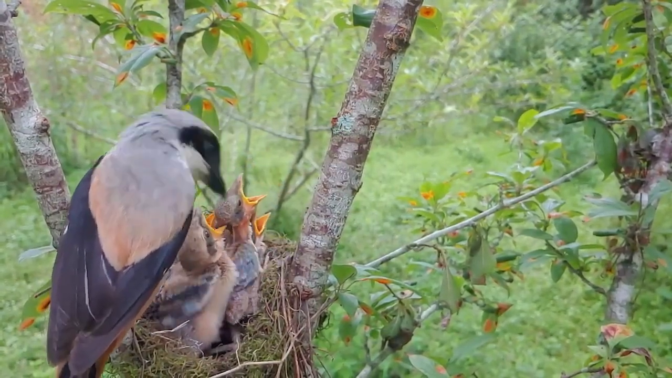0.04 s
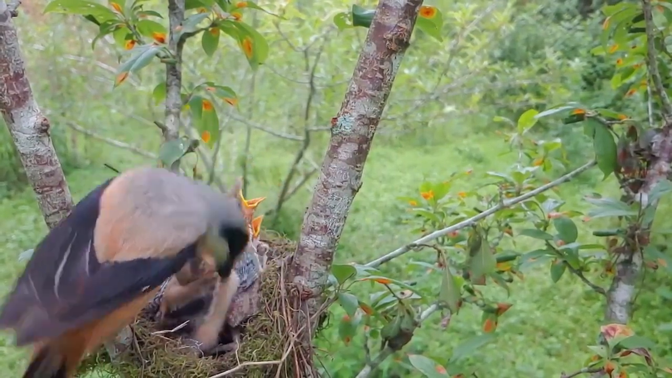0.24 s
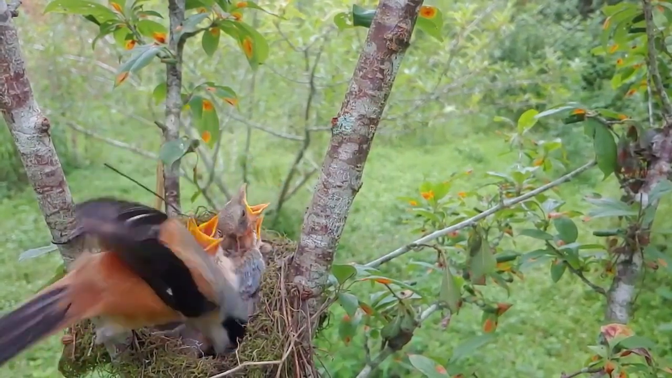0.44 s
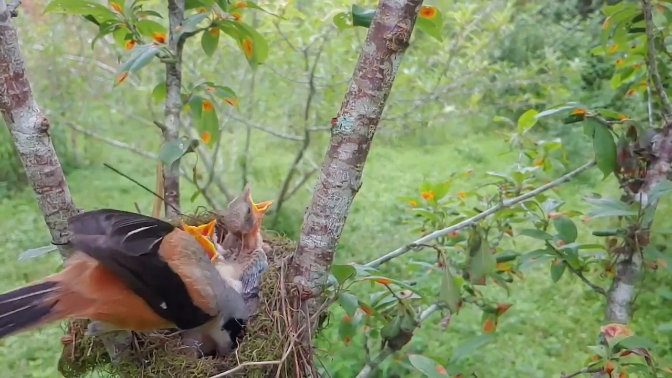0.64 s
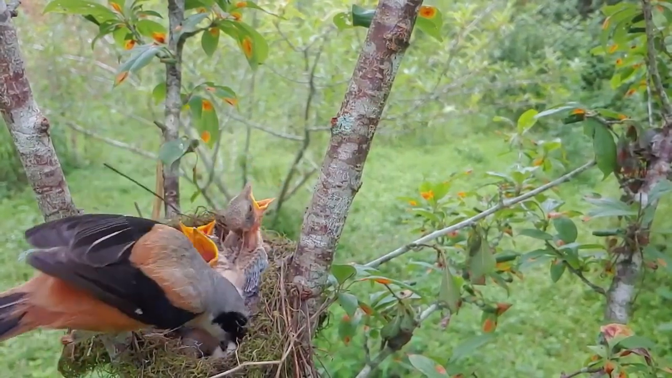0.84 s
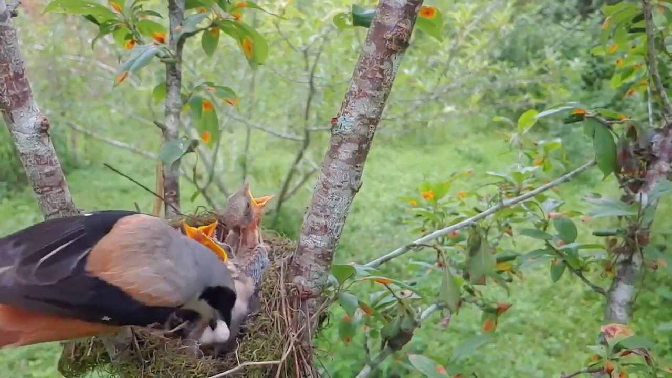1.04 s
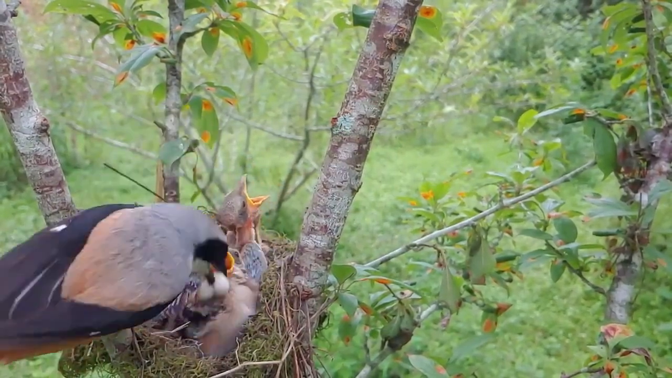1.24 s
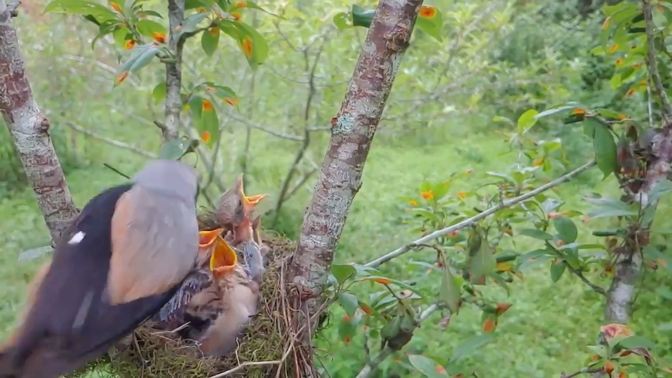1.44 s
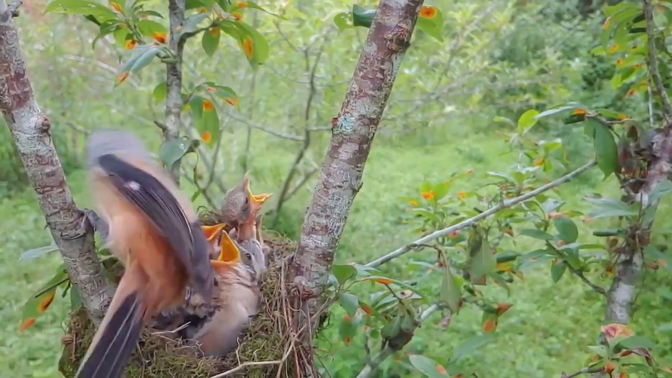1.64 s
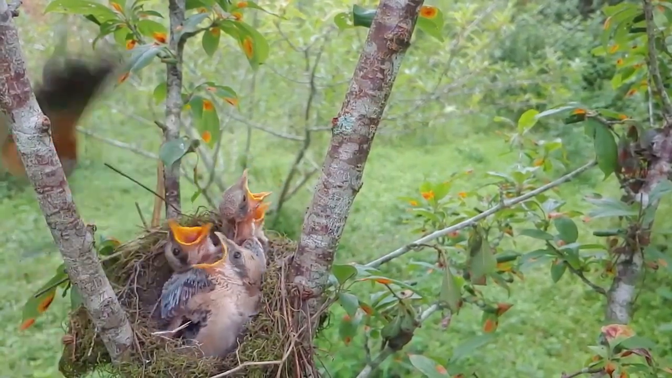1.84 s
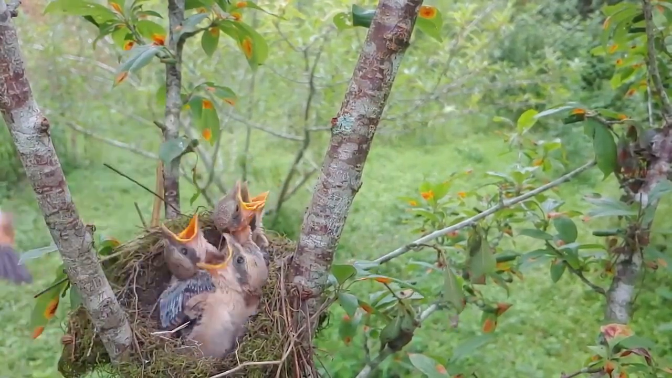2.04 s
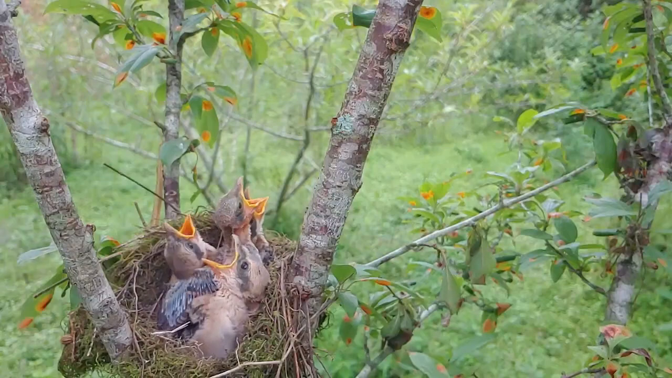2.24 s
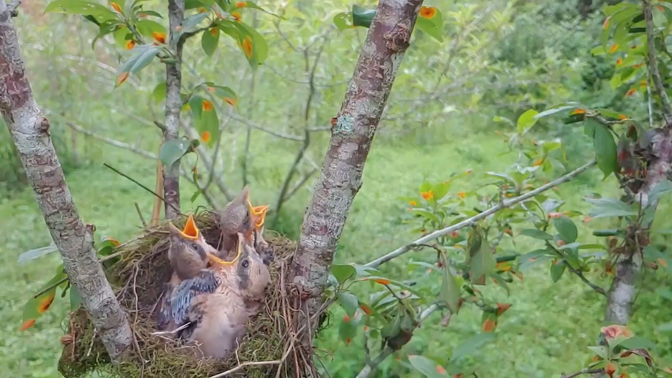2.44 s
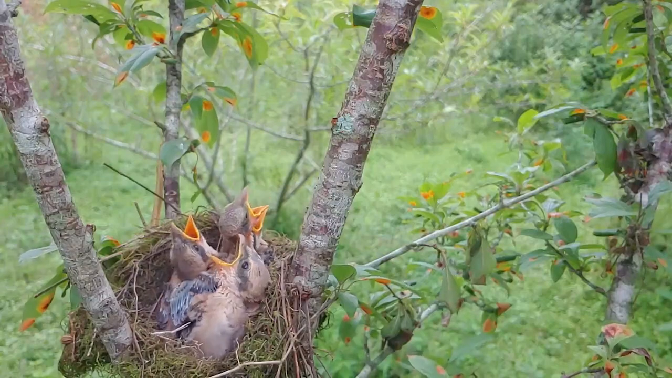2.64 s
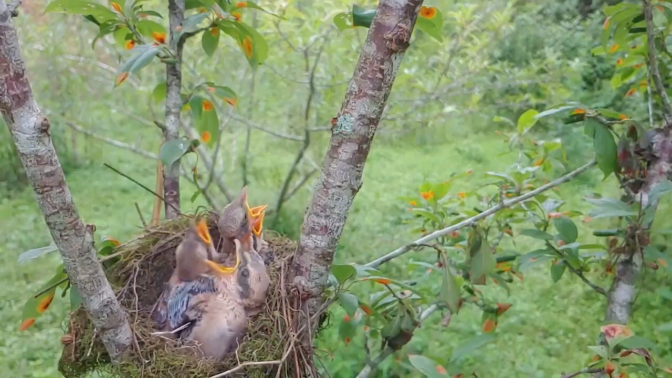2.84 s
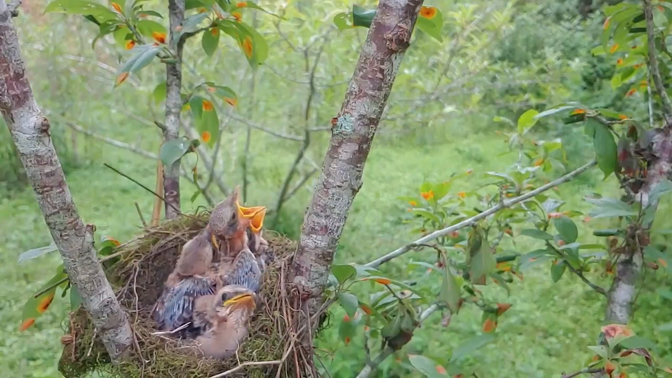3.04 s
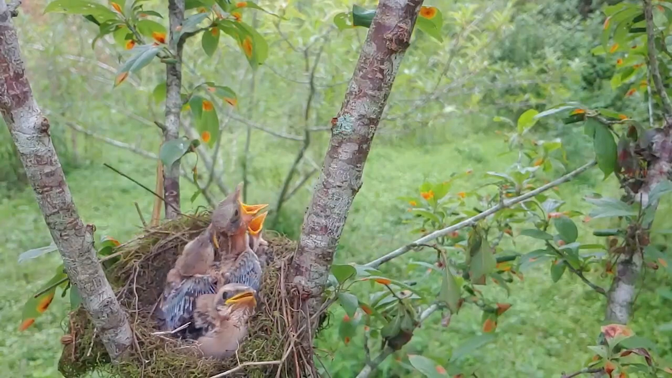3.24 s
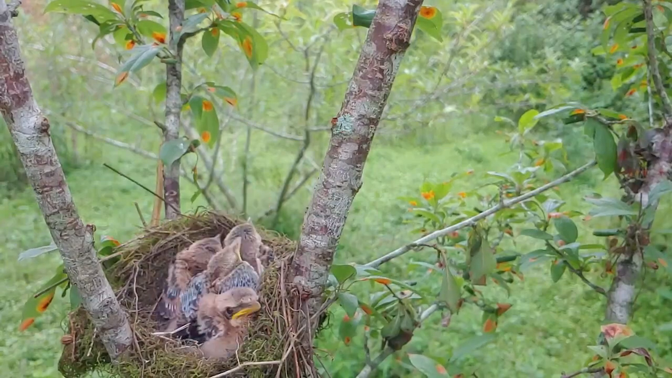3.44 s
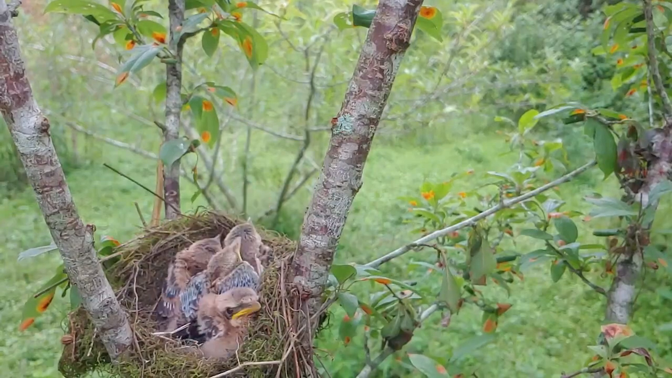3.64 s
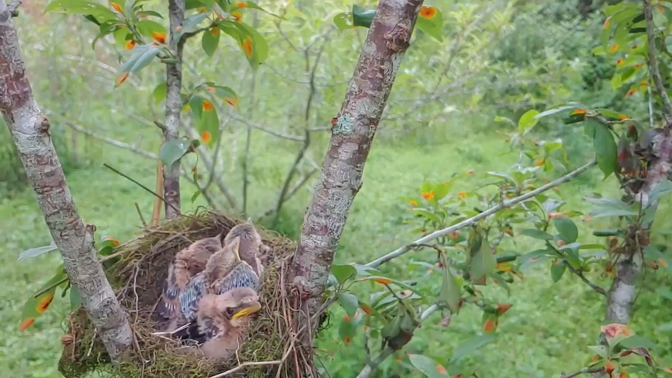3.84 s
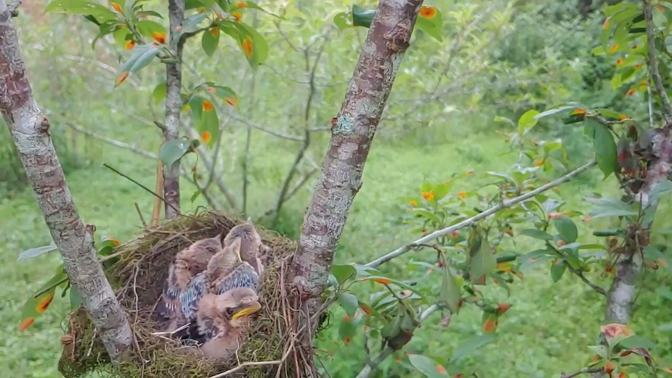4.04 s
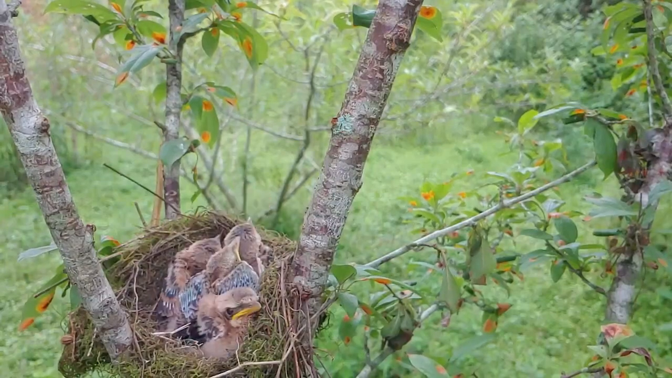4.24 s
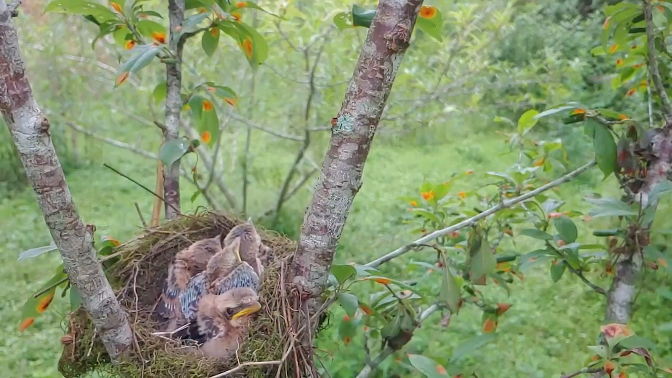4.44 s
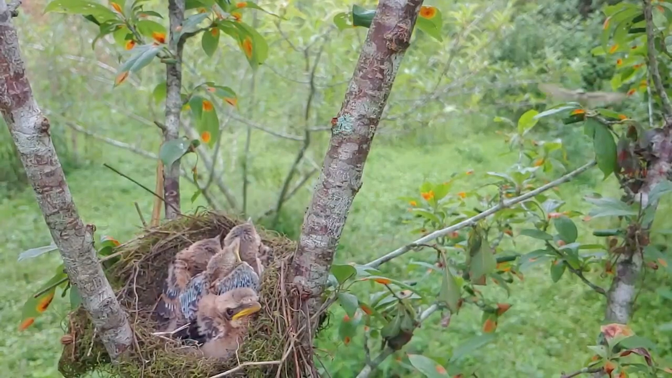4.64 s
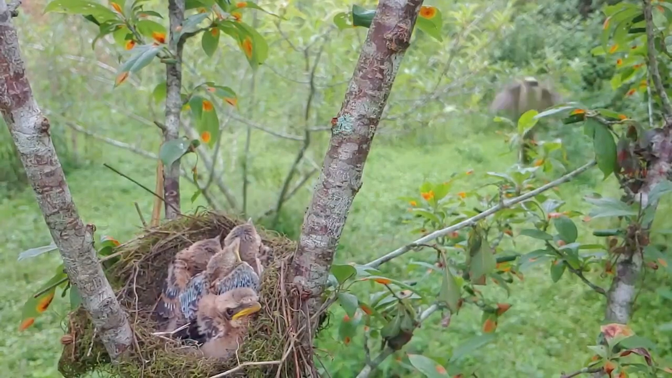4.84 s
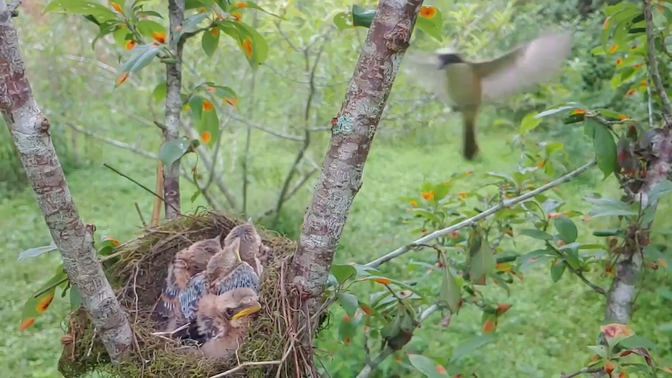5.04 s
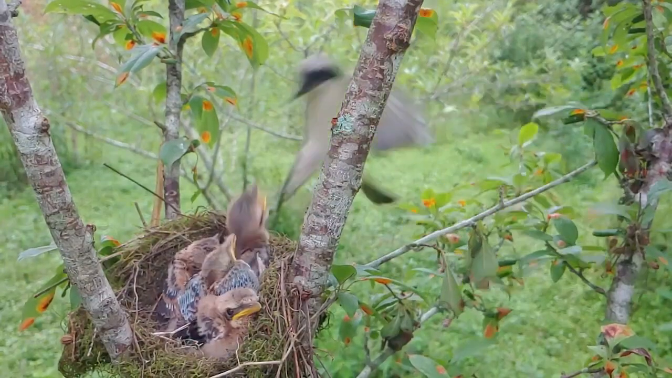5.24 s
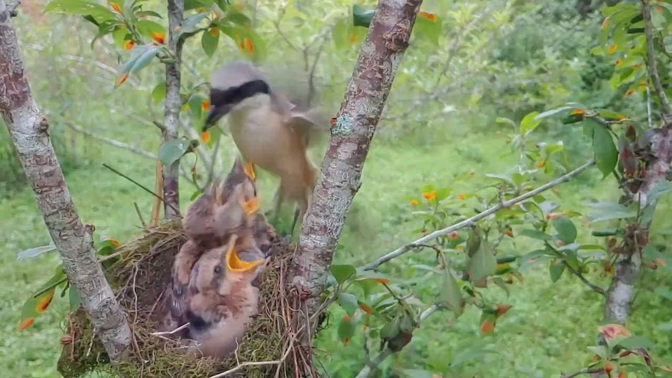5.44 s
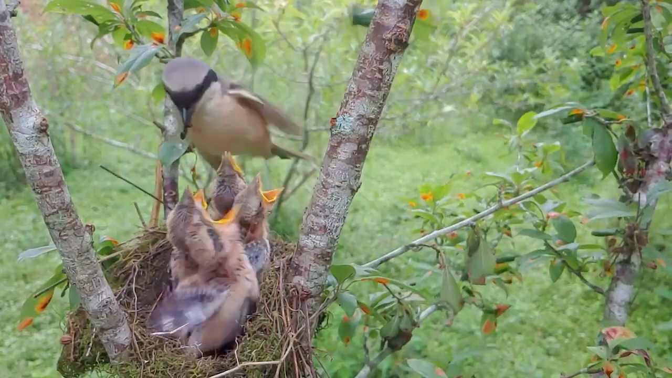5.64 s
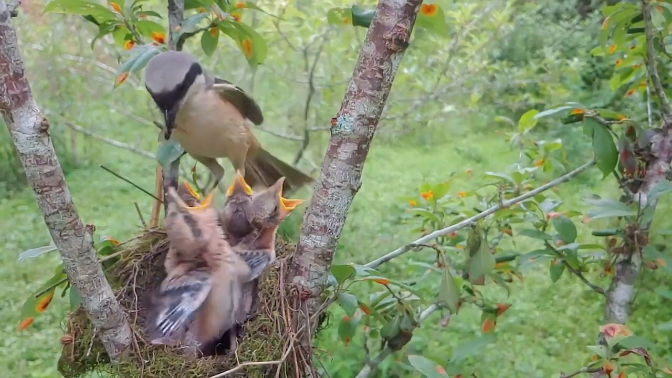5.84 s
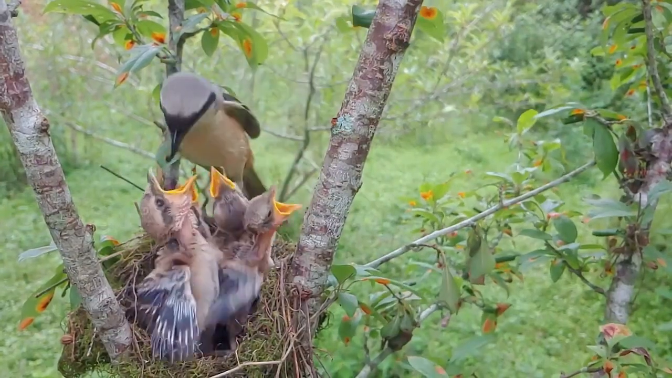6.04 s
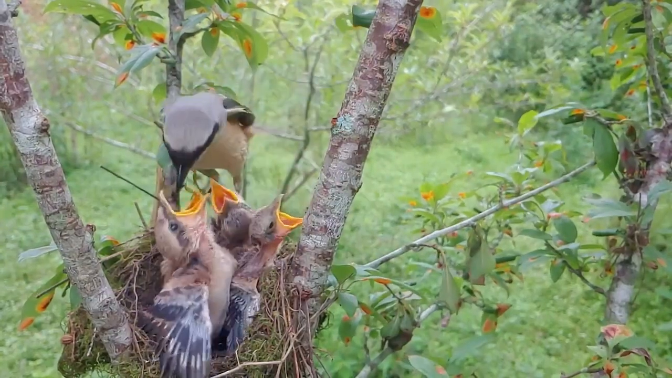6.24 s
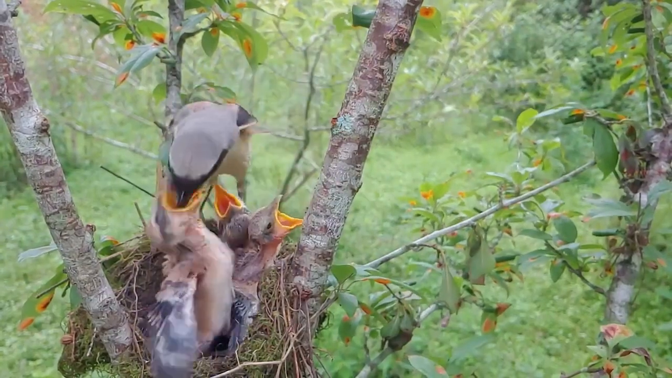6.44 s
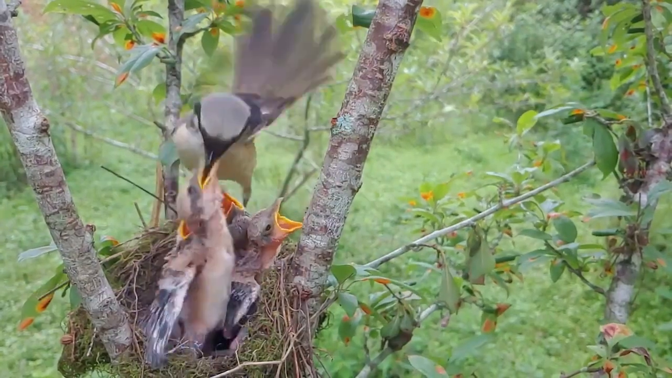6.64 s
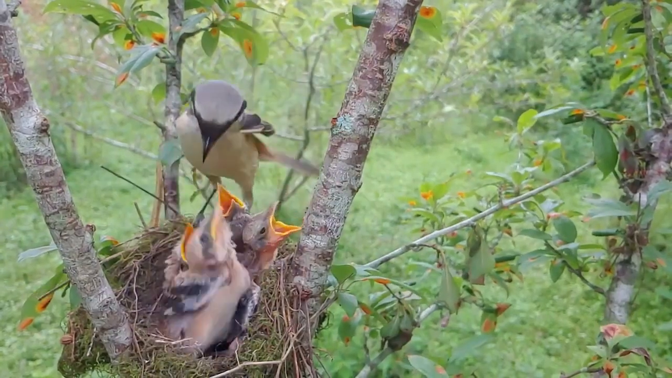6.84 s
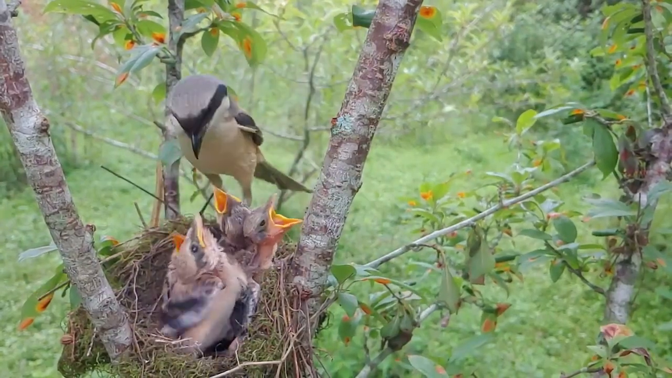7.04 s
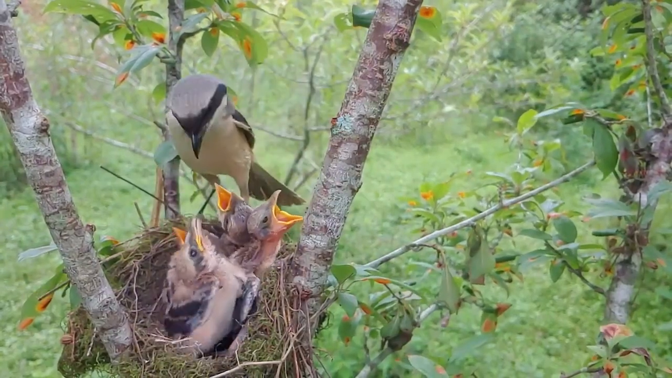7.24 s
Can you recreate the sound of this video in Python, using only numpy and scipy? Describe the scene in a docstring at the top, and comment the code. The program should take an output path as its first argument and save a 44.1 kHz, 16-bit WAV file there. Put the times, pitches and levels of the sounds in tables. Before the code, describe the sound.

Close hungry chicks squeal hoarsely and nonstop, fall nearly silent after a wing flutter, then clamour louder at the next arrival; crickets trill throughout.

```python
"""Shrike nestlings beg in a garden tree: arching whistles that break into rasps, squeaks and plunging chups.
One parent whirrs off, the brood falls quiet, and another flaps in through the leaves and sets them off again.
Crickets chirp all along, with far birds and a faint far motor over soft outdoor air.
Voices are wavering tones with overtones, shaped by a beak response; rasps add throat noise.
Wings are low pulses with bursts of coloured noise; crickets are pulsed tones over a noise chorus."""
import sys
import numpy as np
from scipy import signal
from scipy.fft import rfft, irfft, next_fast_len
from scipy.io import wavfile
from scipy.ndimage import uniform_filter1d, map_coordinates

SR = 44100
rng = np.random.default_rng(int(sys.argv[2]) if len(sys.argv) > 2 else 0)


def pcm_store(signal):
    """Save signal as 16-bit PCM."""
    levels = np.round(np.clip(np.atleast_2d(signal), -1, 1) * 32767)
    wavfile.write(sys.argv[1], SR, levels.astype(np.int16).T)


N = 321930  # samples

# Note tables give nominal times and pitches, and drive levels ahead of the beak and the gains below.

# Outdoor air spectrum. Each row: frequency in Hz, relative level in dB.
AIR_SPECTRUM = [(20, -4), (50, 1.5), (110, -3.5), (300, -7.5), (600, -11), (1000, -15), (1800, -23),
                (2700, -17.5), (4600, -13.5), (5700, -9.5), (6300, -12), (6800, -7.5), (7600, -23),
                (9000, -28.5), (10500, -28.5), (11600, -40), (12300, -80)]
# Far motor. Each row: time in seconds, level in dB.
MOTOR_LEVELS = [(0, -105), (4.1, -86), (4.4, -67.5), (5, -76), (5.8, -73), (7.3, -67)]
# Likeness of the two ears in diffuse noise. Each row: frequency in Hz, left-right correlation.
EAR_LIKENESS = [(50, 0.085), (250, 0.25), (900, 0.11), (3500, 0.38), (7000, 0.019)]
# Mass of far crickets. Each row: frequency in Hz, relative level in dB.
CHORUS_SPECTRUM = [(1820, -42), (3100, -20), (3360, -7.5), (3570, 2.5), (3780, 5.5), (4190, 5.5),
                   (4350, -11), (4380, -19), (4510, -6), (4700, -38), (6110, -58), (10300, -120)]
# Long thin far note. Each row: start in seconds, end in seconds, top pitch in Hz, sag of the ends as a share,
# level in dB.
FAR_NOTES = [(4.85, 5.95, 2162, 0.0039, -64)]
# Soft arched peeps of the brood. Columns as in FAR_NOTES.
PEEPS = [(3.865, 3.9, 3130, 0.074, -69), (3.93, 3.98, 3120, .1, -76), (4.13, 4.17, 3260, 0.12, -66),
         (4.18, 4.225, 3120, .01, -68), (4.255, 4.3, 3030, 0.092, -68), (4.31, 4.35, 2980, .08, -71.5),
         (4.455, 4.493, 3360, 0.16, -63), (4.46, 4.53, 3060, 0.027, -69), (4.505, 4.585, 3240, 0.14, -69),
         (4.783, 4.95, 3210, 0.19, -66), (5.34, 5.41, 3180, 0.16, -65)]
# Parent's take-off, interpolated over the beats. Each row: time in seconds, thump in dB, swish in dB.
TAKEOFF_LEVELS = [(2.05, -57, -56.5), (2.11, -40.5, -58), (2.17, -41.5, -50), (2.23, -48, -58.5),
                  (2.35, -50, -58.5), (2.5, -54, -65), (3.35, -61.5, -85)]
# Wingbeats of the landing parent. Each row: time in seconds, thump in dB, swish in dB.
LANDING_FLAPS = [(5.02, -59, -76), (5.081, -57, -61.5), (5.144, -57, -62), (5.278, -60, -62),
                 (5.318, -53.5, -63), (5.37, -47, -57), (5.421, -50, -55.5), (5.581, -46.5, -47),
                 (5.626, -49, -55), (5.701, -46.5, -45.5), (5.756, -49.5, -47)]
# Feathers on leaves. Each row: frequency in Hz, relative level in dB.
SWISH_SPECTRUM = [(80, 3), (250, 4), (600, 1.5), (1200, 0.5), (2200, -9), (6000, -21), (9000, -13.5),
                  (12000, -23.5), (15500, -77)]
# Throat resonance of the rasp and hiss. Each row: frequency in Hz, relative level in dB.
THROAT_RESPONSE = [(500, -22), (1100, -9.5), (1900, -9.5), (2600, -6), (3500, -1.5), (4600, -4),
                   (5800, -3.5), (6700, -4.5), (7400, -19.5), (10000, -20), (12000, -64)]
# Radiation of the voice from the beak. Each row: frequency in Hz, gain in dB.
BEAK_RESPONSE = [(800, 6), (6500, 1.5), (7000, -12), (7600, -17.5), (10000, -29), (12500, -60)]
# Low notes that flick up into a hook. Each row: start in seconds, hook in seconds, level at the hook in dB.
FLICKS = [(5.919, 5.964, -53.5), (6.016, 6.068, -51.5), (6.092, 6.133, -53.5), (6.214, 6.292, -53),
          (6.402, 6.457, -50.5), (6.581, 6.625, -51), (6.698, 6.787, -66), (6.897, 6.948, -51),
          (7.054, 7.116, -51.5)]
# Low tones that dip and rise. Each row: start in seconds, end in seconds, lowest pitch in Hz,
# turning point as a share, level in dB.
UNDERTONES = [(5.974, 6.064, 2970, .1, -58.5), (5.981, 6.06, 1510, 0.58, -67),
              (6.24, 6.416, 1401, 0.26, -65.5), (6.772, 6.813, 1480, 0.72, -55),
              (6.797, 6.854, 1318, .56, -56.5), (6.896, 6.944, 1523, 0.78, -62.5)]
# Steep arched cries. Each row: start in seconds, end in seconds, top pitch in Hz, sag of the ends as a share,
# level in dB.
CRIES = [(1.216, 1.356, 5030, 0.16, -54), (6.154, 6.194, 4950, 0.148, -46), (6.168, 6.248, 5480, .08, -54),
         (2.377, 2.425, 3200, .1, -51.5), (6.504, 6.59, 5990, .2, -44.5), (6.612, 6.692, 5850, 0.24, -50.5),
         (6.696, 6.783, 5920, 0.1095, -46.5), (6.922, 6.97, 6090, 0.103, -48),
         (6.997, 7.059, 3360, .15, -55.5), (7.014, 7.059, 6850, 0.087, -48), (7.107, 7.137, 5100, .12, -54),
         (7.165, 7.232, 5950, .11, -52.5), (7.16, 7.237, 4200, 0.168, -58)]
# Plain whistles. Each row: start in seconds, end in seconds, top pitch in Hz, sag as a share
# (negative rises), level in dB.
WHISTLES = [(.005, 0.099, 5200, 0.29, -55.5), (.46, 0.534, 6650, 0.17, -53),
            (0.527, .62, 5450, -0.0048, -63), (0.551, .615, 4600, .03, -64),
            (0.742, 0.816, 5250, 0.076, -58), (0.774, .815, 6550, 0.21, -49.5),
            (0.807, .89, 4750, 0.16, -55.5), (0.852, 0.891, 5200, 0.15, -50),
            (0.973, 1.14, 5100, 0.052, -57), (1.124, 1.205, 5900, 0.3, -55),
            (1.465, 1.516, 5450, .01, -48.5), (1.512, 1.661, 5300, 0.32, -51.5),
            (1.558, 1.624, 6200, 0.045, -52.5), (1.651, 1.755, 5700, 0.034, -48),
            (1.741, 1.852, 5000, 0.054, -52), (1.952, 2.054, 4900, 0.042, -60),
            (2.02, 2.125, 5950, .16, -54.5), (2.092, 2.197, 6000, 0.31, -56), (2.228, 2.29, 5200, .1, -52),
            (2.272, 2.34, 4850, .06, -60), (2.547, 2.626, 5800, 0.11, -53), (2.6, 2.666, 4300, 0.26, -53),
            (3.128, 3.187, 5150, 0.027, -55), (3.181, 3.406, 4750, 0.028, -50.5),
            (3.198, 3.26, 4850, 0.17, -54), (5.742, 5.84, 5790, 0.014, -53.5),
            (5.815, 5.841, 3450, 0.077, -59.5), (5.827, 5.852, 6080, 0.08, -53),
            (5.85, 5.96, 6840, 0.13, -59.5), (5.887, 5.964, 4530, -0.013, -52.5),
            (5.934, 6.053, 5000, 0.035, -51), (5.99, 6.056, 5950, 0.093, -47),
            (6.038, 6.09, 3900, .25, -57), (6.082, 6.123, 4650, .06, -50.5),
            (6.253, 6.366, 5130, 0.0039, -51), (6.265, 6.292, 4600, 0.081, -47),
            (6.362, 6.385, 4800, 0.0085, -50.5), (6.36, 6.409, 4000, 0.16, -49.5),
            (6.452, 6.522, 5800, 0.044, -60), (6.556, 6.573, 4500, -.2, -44),
            (6.791, 6.819, 4700, 0.052, -44), (6.8, 6.87, 5500, 0.31, -51),
            (6.871, 6.937, 4500, -0.26, -55), (6.685, 6.715, 3410, .17, -56.5),
            (6.901, 6.937, 2380, 0.26, -60), (7.263, 7.296, 3630, 0.12, -51.5),
            (7.271, 7.293, 6760, .05, -56)]
# Calls that turn hoarse and end on a squeak. Each row: start in seconds, end in seconds, top pitch in Hz,
# sag as a share, whistle in dB, rasp in dB, squeak in dB, left over right in dB (whistle only).
HOARSE_CALLS = [(-0.08, 0.102, 7180, 0.33, -55, -47, -49, 11), (0.137, 0.335, 6020, 0.27, -52, -50, -51, 3),
                (0.375, 0.625, 6030, 0.3, -52.5, -47.5, -47.5, 10),
                (0.689, 0.895, 6740, 0.14, -54, -46, -49, -7),
                (0.968, 1.14, 6430, 0.2, -49.5, -48.5, -48, -1.5),
                (1.217, 1.377, 6540, 0.26, -50.5, -48.5, -52, 1),
                (1.458, 1.626, 6960, 0.3, -54.5, -46.5, -49, 0),
                (1.708, 1.873, 6740, 0.3, -53, -46, -49, 2.5),
                (1.95, 2.163, 6275, 0.28, -49.5, -46, -48, 6),
                (2.243, 2.396, 6120, 0.24, -49, -51.5, -57, 4),
                (2.464, 2.596, 6110, 0.26, -49.5, -49, -55, 3),
                (2.675, 2.833, 6000, 0.26, -51.5, -47.5, -53.5, 9),
                (2.906, 3.059, 6320, 0.28, -51, -47.5, -56, 2.5),
                (3.118, 3.264, 6960, 0.3, -52.5, -46.5, -48, 0),
                (5.524, 5.621, 6000, 0.21, -60.5, -48.5, -56.5, 3),
                (5.654, 5.795, 5290, 0.4, -56.5, -47.5, -53, 3),
                (5.85, 5.979, 5500, 0.14, -53.5, -46, -64, 7), (5.983, 6.14, 5510, 0.27, -59, -52, -57, 8),
                (6.119, 6.197, 4990, 0.031, -55, -52.5, -62, 2),
                (6.21, 6.28, 6670, 0.14, -57, -48.5, -54.5, -3),
                (6.298, 6.461, 5375, 0.067, -47, -53, -51, 3),
                (6.488, 6.613, 5900, 0.21, -53, -46.5, -58, 6),
                (6.679, 6.839, 5860, 0.17, -55, -41.5, -68, 12),
                (7.16, 7.299, 5900, 0.27, -56.5, -46, -59, 8)]
# Calls that plunge into a low chup. Each row: start in seconds, chup in seconds, top pitch in Hz, whistle in dB,
# rasp in dB, squeak in dB, chup pitch in Hz, chup in dB, left over right in dB (whistle only).
CHUP_CALLS = [(-0.1, 0.022, 6170, -53, -65, -50, 1274, -50.5, 10),
              (0.17, 0.27, 6920, -56.5, -70, -49, 1325, -54, 4),
              (0.386, 0.492, 6860, -52, -57, -50, 1270, -52, -2),
              (0.566, 0.695, 6050, -51, -49, -47, 1251, -51.5, 2),
              (0.809, 0.936, 6150, -50, -55, -49, 1264, -53, 2),
              (1.076, 1.186, 6170, -55, -56, -50, 1302, -57.5, -1),
              (1.3, 1.433, 6110, -51.5, -53, -50.5, 1173, -55, 1),
              (1.548, 1.7, 6040, -62, -54, -46.5, 1215, -61, -3),
              (1.832, 1.969, 5990, -48.5, -54, -46.5, 1212, -54, 1),
              (2.079, 2.224, 6080, -52, -45.5, -44, 1326, -51, 3),
              (2.323, 2.424, 5500, -72, -45, -51, 1321, -49.5, -1),
              (2.549, 2.675, 5480, -69, -49, -48.5, 1268, -51, 7),
              (2.814, 2.901, 5700, -55, -51.5, -46.5, 1257, -52, 6),
              (3.067, 3.148, 5940, -53, -53, -49.5, 1287, -51.5, 2),
              (3.274, 3.372, 5780, -54, -57, -47.5, 1212, -50, -9),
              (5.951, 6.089, 5320, -49, -50.5, -54, 1252, -53, 14),
              (6.218, 6.388, 5850, -52, -45.5, -80, 860, -59.5, 10),
              (6.355, 6.418, 4720, -53, -50, -50, 1323, -54.5, 9),
              (6.361, 6.457, 5550, -44, -44, -54, 958, -59.5, -1),
              (6.736, 6.804, 6080, -54, -56, -67, 1155, -52, 10),
              (6.82, 6.946, 4600, -56, -44, -55, 1323, -52.5, -3),
              (6.943, 7.052, 6120, -47, -50, -47.5, 1398, -49, 1),
              (7.06, 7.142, 4730, -54.5, -42.5, -64, 1310, -46, -2),
              (7.127, 7.179, 4250, -56, -51, -76, 806, -64, -6)]

BAND_LIMIT_HZ = 15500
# wings
TAKEOFF_S, WINGBEAT_S = 2.05, .0604  # first beat, beat spacing
PUSH_HZ, PUSH_UPPER_HZ, PUSH_SLIDE_HZ_PER_S = 48, 96, 1500  # thump pitches; the upper falls
PUSH_S, EDDY_DB = 0.023, -2  # Gaussian width; eddies before shaping
SWISH_SOFT_HZ, SWISH_BRIGHTEN = 1120, 0.79  # treble above this grows with strength to this power
# whistles
SCOOP, SCOOP_S, SAG_POWER = 0.1007, 0.00605, 1.4  # flat share at onset, time constant, steepening of the sag
DIVE, DIVE_S = 0.0715, 0.01202  # final pitch drop as the breath runs out: share, time constant
PLAIN_SCOOP, PLAIN_SAG_POWER = .03, 1.2
FADE_DB = -4.5  # early to late
SECOND_RATIO, SECOND_SAG, SECOND_SAG_POWER, SECOND_SCOOP = .8, 0.44, 2.3, 0.171  # other side of the syrinx
SECOND_DB, SECOND_FADE_DB = -12, -10  # against the first side; early to late
CRY_SKEW = .75  # under 1: rises faster than it falls
# rasps and call endings
HISS_DB = -14  # against the whistling
RASP_SHARE, RASP_OVERHANG_S, RASP_DB = .85, 0.01186, -2.5  # hoarse last share, overhang, gain
SQUEAK_S = 0.025  # before a random stretch
CHUP_SAG, CHUP_GAP_S = 0.18, 0.01618  # whistle sag; silence of the whistle before the chup
BREAK_LEAD_S, BREAK_S, BREAK_RATIO, BREAK_DB = .024, .044, 2.68, -2  # squeak before a chup; pitch over the chup's
CHUP_FULL_DB, CHUP_BRIGHTEN = -51.5, 0.62  # weaker chups lose overtones, dB per dB
# flicks and peeps
FLICK_LOW_HZ, FLICK_TOP_HZ, FLICK_SINK = 2060, 2866, 49  # sink: share of the low pitch per squared second
FLICK_S, FLICK_LOW_DB = .017, -8  # Gaussian width; gain per unit of (1.5 - hook)
HOOK_S, HOOK_DB = .06, -12  # faint flick of a hoarse call: time scale, level against the rasp column
PEEP_WAVER, FLUTTER_DB = .017, 190  # pitch waver as a share; level flutter per unit of waver


def amp(db):
    """Decibels to gain."""
    return 10 ** (np.asarray(db) / 20)


def unit(x):
    """Scale to rms 1."""
    return x / np.sqrt(np.mean(x ** 2) + 1e-20)


def along(points, hz):
    """Interpolate (Hz, value) points on a log frequency axis."""
    f, v = np.transpose(points)
    return np.interp(np.log(hz + 1), np.log(f + 1), v)


def wobble(rate_hz, size=N):
    """Smooth random curve through rate_hz random knots a second."""
    knots = rng.standard_normal(int(size * rate_hz / SR) + 4)
    return map_coordinates(knots, [np.arange(size) * rate_hz / SR], order=2)


def running_phase(hz):
    """Integrate a pitch curve in Hz to radians."""
    return 2 * np.pi * np.cumsum(hz) / SR


def filtered(x, response):
    """Multiply the spectrum of x by a response of frequency."""
    m = next_fast_len(N + 8192)
    return irfft(rfft(x, m) * response(np.fft.rfftfreq(m, 1 / SR)), m)[..., :N]


def rush(spectrum, likeness):
    """Stereo noise of rms 1; the mid-side balance sets the left-right likeness."""
    def mid_side_gains(hz):
        angle = np.arccos(np.clip(along(likeness, hz), -1, 1)) / 2
        return amp(along(spectrum, hz)) * [np.cos(angle), np.sin(angle)]

    mid, side = filtered(rng.standard_normal((2, N)), mid_side_gains)
    return unit(np.array([mid + side, mid - side]))


def add(track, start_s, x):
    """Mix x into the track from start_s on, clipping at both ends of the track."""
    i = round(start_s * SR)
    x = x[..., max(-i, 0):max(N - i, 0)]
    track[..., max(i, 0):max(i, 0) + x.shape[-1]] += x


def progress(length_s):
    """0 to 1 over a note, one value per sample."""
    return np.linspace(0, 1, max(round(length_s * SR), 64))


def fades(u, edge):
    """Soft start and end, each a share of the note."""
    return np.sin(np.pi / 2 * np.clip(np.minimum(u, 1 - u) / edge, 0, 1)) ** 2


def voice(hz, overtones_db, pan_db, spread):
    """Tone with overtones through the beak response; a random phase spread widens it between the ears."""
    phase = running_phase(hz)
    ears = amp([[pan_db / 2], [-pan_db / 2]])
    tone = 0
    for k, db in enumerate([0, *overtones_db], 1):
        shift = rng.uniform(0, 2 * np.pi) + spread * rng.normal() * np.array([[1], [-1]])
        tone = tone + amp(db + along(BEAK_RESPONSE, k * hz)) * np.sin(k * phase + shift)
    return np.sqrt(2) * unit(ears) * tone


def foliage(x, t60_s):
    """Short diffuse answer from leaves and trunks: decaying noise, different at each ear."""
    t = np.arange(SR // 2) / SR
    tail = rng.standard_normal((2, len(t))) * amp(-60 * t / t60_s) * (t > .002)
    return signal.fftconvolve(x, tail / np.linalg.norm(tail[0]), axes=1)[:, :N]


def arches(notes, waver):
    """Soft notes that rise and fall; the more they waver, the more they flutter."""
    out = np.zeros((2, N))
    for start_s, end_s, top_hz, sag, db in notes:
        u = progress(end_s - start_s)
        hz = top_hz * (1 - sag * (2 * u - 1) ** 2 + waver * wobble(147.0, len(u)))
        flutter = amp(FLUTTER_DB * waver * wobble(300, len(u)))
        level = amp(db) * flutter * fades(u, edge=0.094)
        add(out, start_s, level * voice(hz, [-25], pan_db=-2.5, spread=0.86))
    return out


def garden():
    """Soft coloured air noise, and a far motor as an unsteady low drone with overtones."""
    air = amp(-60.4 + .9 * wobble(3)) * rush(AIR_SPECTRUM, EAR_LIKENESS)
    motor_hz = 155 * (1 + 0.01 * wobble(3.8) + .03 * wobble(70))
    drone = voice(motor_hz, [3.5, -3, -4], pan_db=-1.5, spread=0.81)
    motor_db = np.interp(np.arange(N) / SR, *np.transpose(MOTOR_LEVELS)) + 2.5 * wobble(10)
    return air + amp(motor_db) * unit(drone)


def cricket(top_hz, fall, strokes_hz, bouts_hz, depth_db):
    """Wing strokes, each a falling tone, swell and ebb in regular bouts."""
    stroke = np.cumsum(strokes_hz * (1 + .1 * wobble(20))) / SR % 1
    bout = np.cumsum(bouts_hz * (1 + 0.022 * wobble(1.97))) / SR + rng.uniform()
    level = fades(stroke, edge=0.21) * amp(depth_db * np.sin(2 * np.pi * bout) + 3 * wobble(40))
    hz = top_hz * (1 - fall * stroke + 0.00768 * wobble(800))
    return unit(level * voice(hz, [], pan_db=-1, spread=0.55))


def crickets():
    """Three near singers overlap above a throbbing far chorus of coloured noise."""
    throb = amp(4.1 * np.sin(running_phase(16 + 0.16 * wobble(1.89))))
    near = amp(-59.5) * cricket(top_hz=4350, fall=.21, strokes_hz=48, bouts_hz=16, depth_db=3)
    second = amp(-63) * cricket(top_hz=4250, fall=.17, strokes_hz=43, bouts_hz=3.3, depth_db=3)
    high = amp(-73) * cricket(top_hz=5450, fall=.11, strokes_hz=95, bouts_hz=9, depth_db=4)
    return near + second + high + amp(-57.5) * throb * rush(CHORUS_SPECTRUM, EAR_LIKENESS)


def far_song():
    """A far bird pipes an even run of notes, loudest near 2 s; a long thin note swells later."""
    starts_s = 1.36 + np.arange(9) / 7.6
    run = [(s, s + 0.072, 2235, .02, -69 - 10 * abs(s - 2)) for s in starts_s]
    swell = amp(-2.5 - 24 * np.abs(np.arange(N) / SR - 5.7) + 1.5 * wobble(8))
    return foliage(arches(run, waver=0.008), t60_s=0.64) + swell * arches(FAR_NOTES, waver=0.0029)


def wings():
    """Each beat thumps the air and swishes the feathers; the whirr fades as the parent flies off."""
    thumps, brush = np.zeros(N), np.zeros(N)
    t = np.arange(-SR // 16, SR // 16) / SR
    beats_s = TAKEOFF_S + WINGBEAT_S * np.arange(22)
    times_s, *levels_db = np.transpose(TAKEOFF_LEVELS)
    leaving = list(zip(beats_s, *[np.interp(beats_s, times_s, db) for db in levels_db]))
    for s, thump_db, swish_db in leaving + LANDING_FLAPS:
        upper = np.sin(2 * np.pi * (PUSH_UPPER_HZ - PUSH_SLIDE_HZ_PER_S * t / 2) * t)
        push = np.cos(2 * np.pi * PUSH_HZ * t) + 0.94 * upper
        eddies = amp(EDDY_DB) * wobble(178.3, len(t)) * np.sin(2 * np.pi * 230 * t)
        eddies = eddies * np.exp(-((t + 0.0029) / 0.01) ** 2)
        thump_level = amp(thump_db - 3.5 + rng.normal(0, 1)) * np.exp(-(t / PUSH_S) ** 2)
        add(thumps, s + t[0] + 0.01194, thump_level * (push + eddies))
        add(brush, s + t[0] + 0.005, amp(swish_db) * np.exp(-(t / 0.012) ** 2))
    swish = brush * unit(amp(4.2 * wobble(600))) * rush(SWISH_SPECTRUM, [(200, 0.95), (4000, 0.58)])
    soft = filtered(swish, lambda hz: 1 / (1 + (hz / SWISH_SOFT_HZ) ** 2))
    return thumps + soft + (swish - soft) * (brush / brush.max()) ** SWISH_BRIGHTEN


def flicks():
    """A low note sinks, then flicks up and swells: faint late in hoarse calls, clear when the brood is eager."""
    out = np.zeros((2, N))
    faint = [(end_s - 1.6 * HOOK_S, end_s - HOOK_S * rng.uniform(0.46, 1.2), rasp_db + HOOK_DB)
             for _, end_s, _, _, _, rasp_db, *_ in HOARSE_CALLS]
    for start_s, hook_s, db in FLICKS + faint:
        u = progress(hook_s + FLICK_S * 0.67 - start_s)
        t = start_s - hook_s + np.arange(len(u)) / SR
        hook = np.exp(-(t / FLICK_S) ** 2)
        hz = FLICK_LOW_HZ * (1 + FLICK_SINK * t ** 2) + (FLICK_TOP_HZ - FLICK_LOW_HZ) * hook
        hz = hz * (1 + .025 * wobble(60, len(u)) + .025 * wobble(900, len(u)))
        level_db = db + FLICK_LOW_DB * (1.5 - hook) + 3.4 * wobble(400, len(u))
        add(out, start_s, amp(level_db) * fades(u, edge=0.1) * voice(hz, [-6], pan_db=-2, spread=0.15))
    return out


def undertones():
    """A low, unsteady tone dips and swings up again under the most eager calls."""
    out = np.zeros((2, N))
    for start_s, end_s, lowest_hz, turn, db in UNDERTONES:
        u = progress(end_s - start_s)
        hz = lowest_hz * (1 + (u - turn) ** 2 + .025 * wobble(700, len(u)))
        level = amp(db + 1 + 2.5 * wobble(350, len(u))) * fades(u, edge=.12)
        add(out, start_s, level * voice(hz, [-5, -9], pan_db=-0.5, spread=.3))
    return out


def chups():
    """A very short plunging note; the harder the chup, the richer its overtones, up to full level."""
    out = np.zeros((2, N))
    for _, chup_s, *_, chup_hz, db, _ in CHUP_CALLS:
        u = progress(.017)
        hz = chup_hz * np.exp(-.46 * (u - .5)) * (1 + 0.02 * wobble(1180, len(u)))
        overtones_db = np.array([-7.5, -1.0, -7.5, -1.5, -9, 0.5])
        overtones_db = overtones_db + CHUP_BRIGHTEN * min(db - CHUP_FULL_DB, 0)
        level = amp(db + 5.0) * fades(u, edge=0.62)
        add(out, chup_s - len(u) / SR / 2, level * voice(hz, overtones_db, pan_db=-0.5, spread=0.033))
    return out


def squeaks():
    """A short slide, ever steeper and randomly varied, ends a hoarse call or leads into a chup."""
    out = np.zeros((2, N))
    notes = [(end_s - 0.38 * SQUEAK_S, SQUEAK_S, 2950, db) for _, end_s, *_, db, _ in HOARSE_CALLS]
    notes += [(chup_s - BREAK_LEAD_S, BREAK_S, BREAK_RATIO * chup_hz, db + BREAK_DB)
              for _, chup_s, *_, db, chup_hz, _, _ in CHUP_CALLS]
    variations = rng.uniform([.65, .6], [1.15, 1.3], (len(notes), 2))
    for (middle_s, length_s, pitch_hz, db), (stretch, steep) in zip(notes, variations):
        u = progress(length_s * stretch)
        slide = steep * (.1 - .12 * u - .22 * u ** 3)
        hz = pitch_hz * (1 + slide + .03 * wobble(130, len(u)) + .045 * wobble(1200, len(u)))
        level = amp(db - 1.0 + 2.0 * wobble(710, len(u))) * fades(u, edge=0.27)
        squeak = level * voice(hz, [-9, -12], pan_db=-0.5, spread=0.11)
        add(out, middle_s - length_s * stretch / 2, squeak)
    return out


def hoarse_stretches():
    """(start s, end s, level dB) of the rasp in the later part of each call."""
    calls = [(start_s, end_s, db) for start_s, end_s, _, _, _, db, *_ in HOARSE_CALLS]
    calls += [(start_s, chup_s, db) for start_s, chup_s, _, _, db, *_ in CHUP_CALLS]
    return [(end_s - RASP_SHARE * (end_s - start_s), end_s + RASP_OVERHANG_S, db + RASP_DB)
            for start_s, end_s, db in calls]


def rasps():
    """The voice breaks into jittery pulses at a falling rate, mixed with air noise; each swells and stops short."""
    pulses, effort = np.zeros((2, N)), np.zeros(N)
    for start_s, end_s, db in hoarse_stretches():
        u = progress(end_s - start_s)
        swell = amp(db - 10.0 * np.abs(u - .74)) * fades(u, edge=0.18)
        jitter = .018 * wobble(110, len(u)) + .018 * wobble(1500, len(u))
        rate_hz = rng.uniform(680, 950) * (1 - .3 * u ** 3 + jitter)
        mean_hz = rate_hz.mean()
        overtones_db = along(THROAT_RESPONSE, mean_hz * np.arange(2, 14)) - along(THROAT_RESPONSE, mean_hz)
        add(pulses, start_s, swell * unit(voice(rate_hz, overtones_db, pan_db=0, spread=.8)))
        add(effort, start_s, swell)
    ringing = filtered(pulses, lambda hz: 1 / (1 + (2500 / (hz + 1)) ** 8))  # high-pass
    breath = effort * rush(THROAT_RESPONSE, [(1500, .6), (5000, .3)])
    flutter = unit(amp(0.87 * wobble(600) + 1.13 * wobble(90)))
    return flutter * (.75 * ringing + .68 * breath) * amp([[.8], [-.8]])


def hiss(tones):
    """Air noise through the open gape follows the strength of the whistling."""
    strength = np.sqrt(np.abs(uniform_filter1d(np.mean(tones ** 2, axis=0), size=900)))
    return amp(HISS_DB) * strength * rush(THROAT_RESPONSE, EAR_LIKENESS)


def arch(length_s, top_hz, sag, power, scoop):
    """Pitch of a whistle: a quick scoop up, a sag shaped by power, and a last dive."""
    u = progress(length_s)
    onset = scoop * np.exp(-u * length_s / SCOOP_S)
    dive = DIVE * np.exp((u - 1) * length_s / DIVE_S)
    return top_hz * (1 - onset - sag * u ** power - dive)


def whistle(pitch_hz, db, fade_db, pan_db):
    """One note wanders and flutters as the chick strains; a slower vibration adds side tones."""
    u = np.linspace(0, 1, len(pitch_hz))
    strain = 0.528 + u ** 2
    wander = .016 * strain * wobble(40, len(u))
    jitter = 0.00824 * wobble(113.0, len(u)) + 0.02 * strain * wobble(1103.6, len(u))
    hz = pitch_hz * (1 + wander + jitter)
    flutter_db = 2.4 * wobble(82.0, len(u)) + 1.9 * strain * wobble(715, len(u))
    level_db = db + fade_db * np.clip(2 * u - 1, -.5, .5) + flutter_db
    beat = running_phase(pitch_hz * 0.11 * (1 + 0.052 * wobble(208.0, len(u))))
    buzz = unit(np.exp((.05 + .75 * u) * np.sin(beat)))
    level = amp(level_db) * fades(u, edge=0.07)
    return level * buzz * voice(hz, [-4, -7], pan_db=pan_db, spread=0.6)


def cries():
    """A whistle sweeps up and down again in an arch, mostly in the late, eager calls."""
    out = np.zeros((2, N))
    for start_s, end_s, top_hz, sag, db in CRIES:
        pitch_hz = top_hz * (1 - sag * (2 * progress(end_s - start_s) ** CRY_SKEW - 1) ** 2)
        add(out, start_s, whistle(pitch_hz, db, fade_db=0, pan_db=4.0))
    return out


def whistles():
    """Plain notes and call openings; in hoarse calls both sides of the syrinx sound, one below the other."""
    out = np.zeros((2, N))
    for start_s, end_s, top_hz, sag, db, _, _, pan_db in HOARSE_CALLS:
        length_s = end_s - start_s
        first = arch(length_s, top_hz, sag, SAG_POWER, SCOOP)
        add(out, start_s, whistle(first, db, FADE_DB, pan_db))
        second = arch(length_s, SECOND_RATIO * top_hz, SECOND_SAG, SECOND_SAG_POWER, SECOND_SCOOP)
        add(out, start_s, whistle(second, db + SECOND_DB, SECOND_FADE_DB, pan_db))
    for start_s, chup_s, top_hz, db, *_, pan_db in CHUP_CALLS:
        pitch_hz = arch(chup_s - CHUP_GAP_S - start_s, top_hz, CHUP_SAG, SAG_POWER, SCOOP)
        add(out, start_s, whistle(pitch_hz, db, FADE_DB, pan_db))
    for start_s, end_s, top_hz, sag, db in WHISTLES:
        pitch_hz = arch(end_s - start_s, top_hz, sag, PLAIN_SAG_POWER, PLAIN_SCOOP)
        add(out, start_s, whistle(pitch_hz, db, FADE_DB, pan_db=3.0))
    return out


def scene():
    """The brood close by with a faint answer from the leaves, the rest of the garden behind."""
    background = garden() + crickets() + far_song() + wings()
    tones = whistles() + cries()
    brood = tones + hiss(tones) + rasps() + squeaks() + undertones() + flicks()
    brood = brood + arches(PEEPS, waver=PEEP_WAVER)
    plunges = chups()
    echoes = amp(-9) * foliage(brood, t60_s=.15) + amp(-21) * foliage(plunges, t60_s=.08)
    return background + brood + plunges + echoes


def record(dry):
    """Sharp low-pass: nothing is kept from the band limit up."""
    return filtered(dry, lambda hz: hz < BAND_LIMIT_HZ)


dry = scene()
out = record(dry)
pcm_store(out)
```